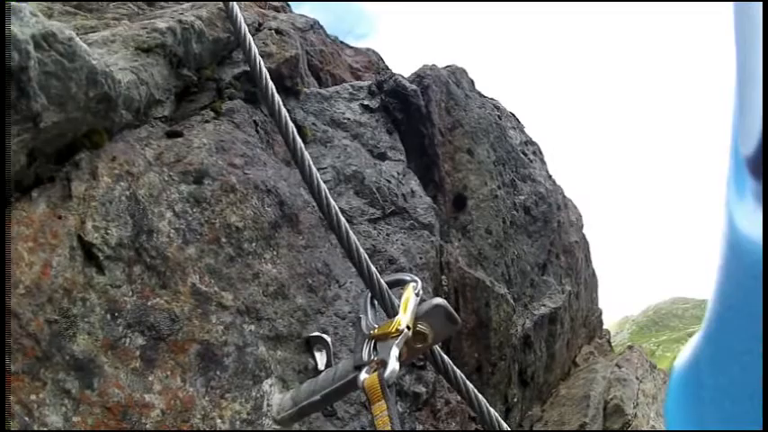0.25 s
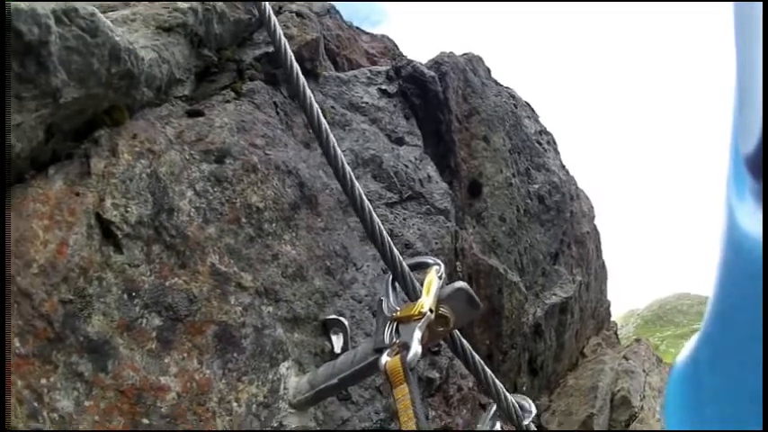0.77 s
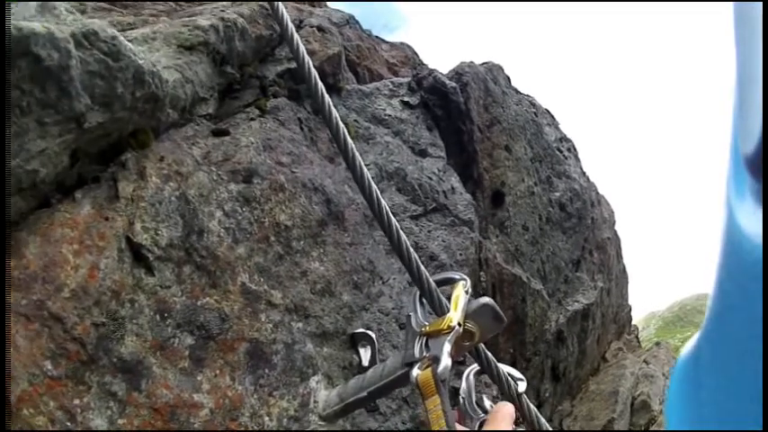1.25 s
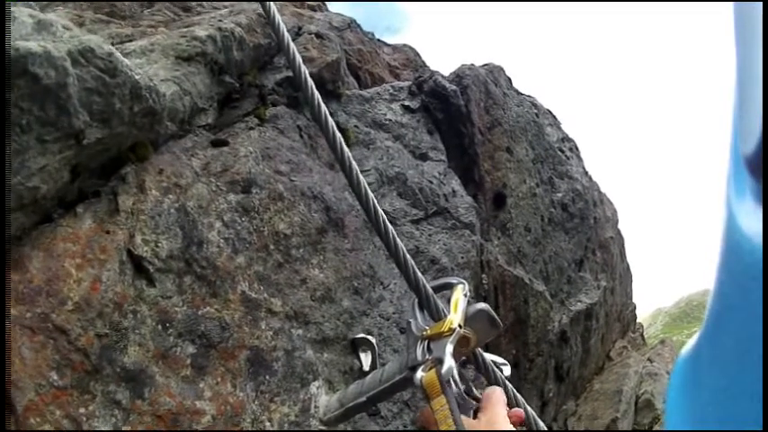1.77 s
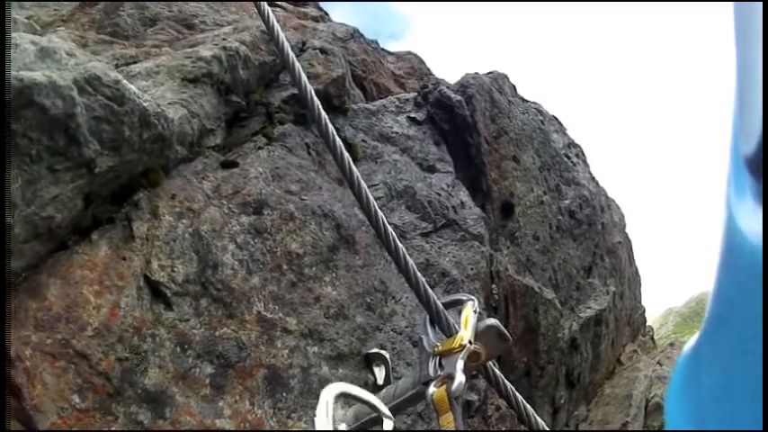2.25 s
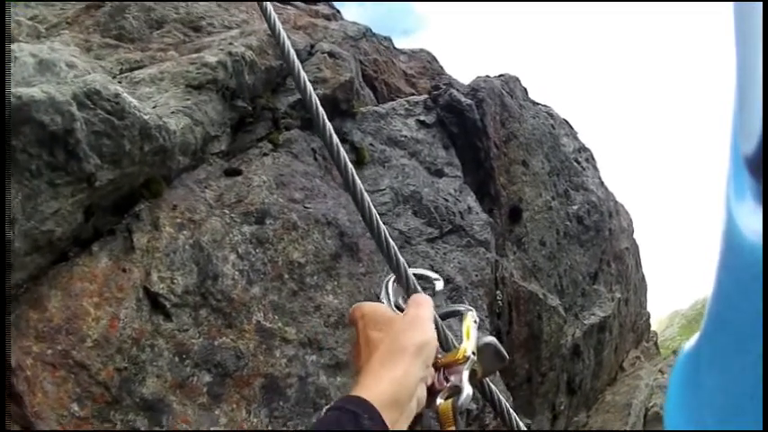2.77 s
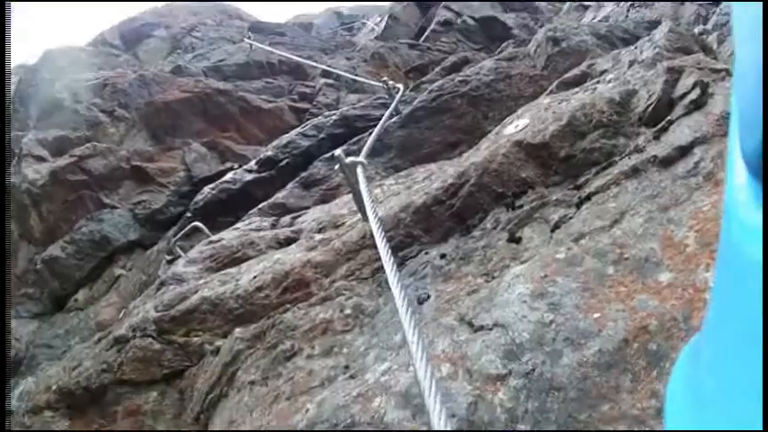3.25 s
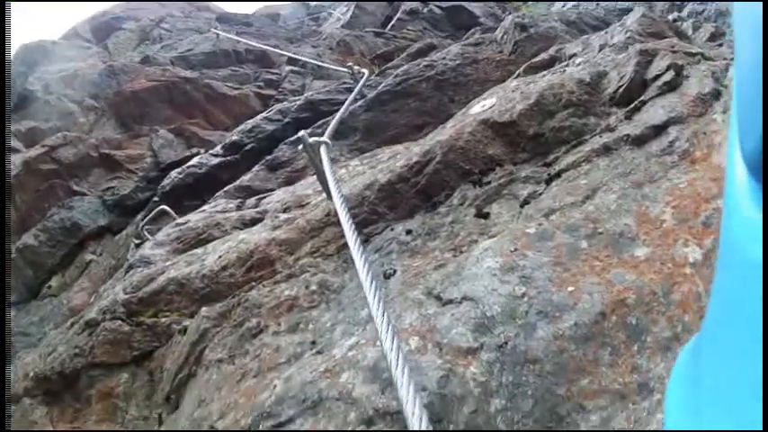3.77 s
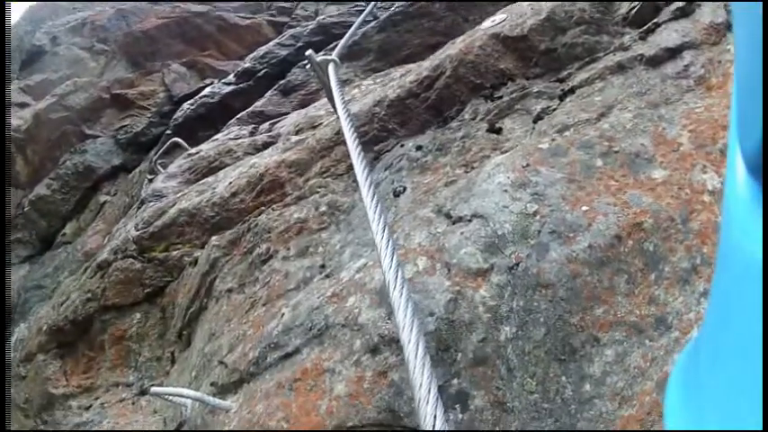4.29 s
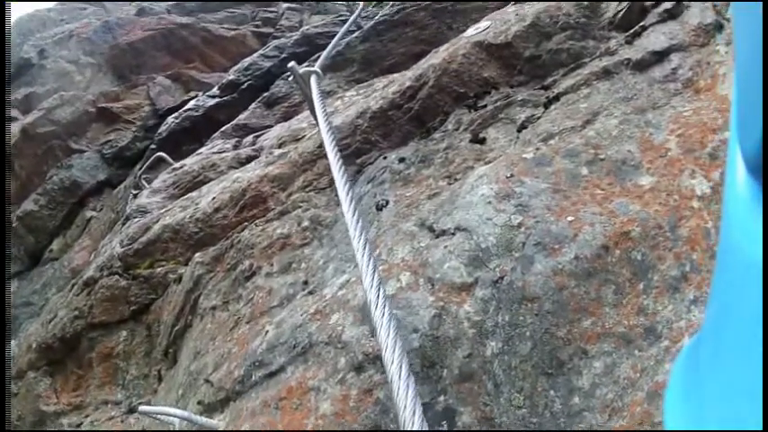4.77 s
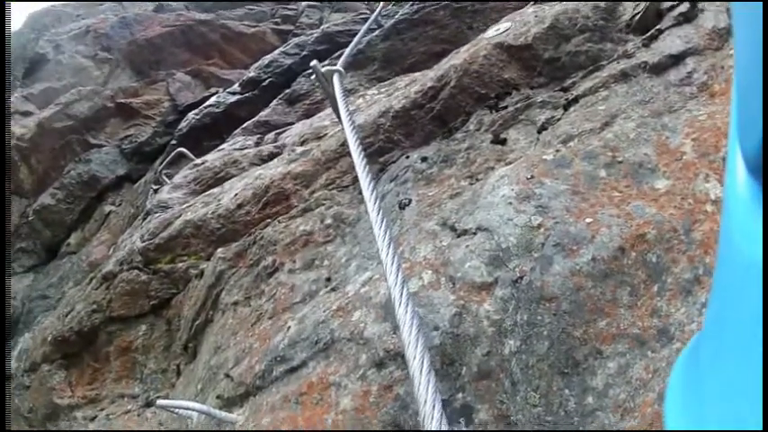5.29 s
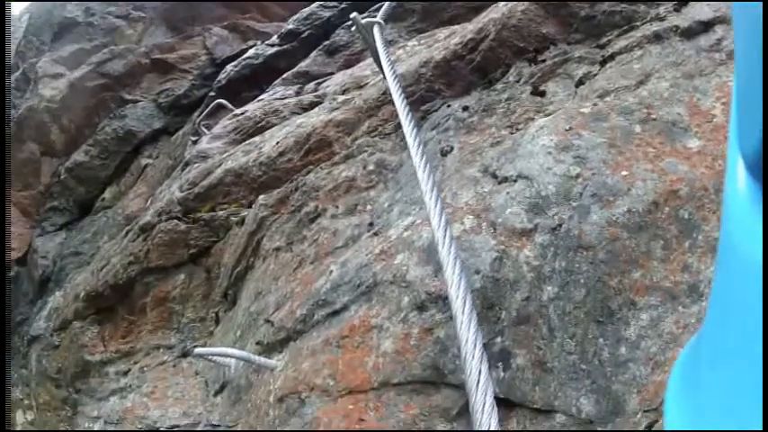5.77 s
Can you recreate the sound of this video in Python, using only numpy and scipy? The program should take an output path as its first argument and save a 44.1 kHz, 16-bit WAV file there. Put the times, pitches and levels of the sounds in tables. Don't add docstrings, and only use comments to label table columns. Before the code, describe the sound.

A climber handles metal carabiners on a steel cable at a rock face, heard close through a housed helmet microphone. Sparse light ticks lead to a hard clack, then a dense rattling cluster of clipping and scraping. Scattered knocks follow, then another busy burst of bright clinks with brief rings, fading into faint hiss.

```python
import sys
import numpy as np
from scipy import signal
from scipy.fft import rfft, irfft, next_fast_len
from scipy.io import wavfile
from scipy.ndimage import uniform_filter1d

SR = 44100
rng = np.random.default_rng(int(sys.argv[2]) if len(sys.argv) > 2 else 0)


def to_wav(sig):
    pcm = np.clip(np.atleast_2d(sig), -1, 1) * 32767
    pcm = np.round(pcm).astype(np.int16)
    wavfile.write(sys.argv[1], SR, pcm.T)


def amplitude_ratio(level_db):
    exponent = np.asarray(level_db, float) / 20
    return 10 ** exponent


N = 266364
TOUCH_SAMPLES = 4096

# pitch_hz, level_db
HOUSING_COLOUR = [(470, -76.5), (800, -40), (1880, -27), (2940, -19), (3380, -7.5), (4110, -4.5),
                  (5540, -5.5), (6290, -1.5), (6970, -7.5), (7560, -14.5), (8990, -25.5), (12600, -41),
                  (16300, -73), (22000, -120)]
# start_s, stopped_at_s, first_mode_db, second_mode_db, third_mode_db
FRAME_SWINGS = [(.439, 0.447, -68.5, -60, -54.5), (4.378, 4.438, -90, -53.5, -76),
                (4.442, 4.497, -99, -51.5, -54), (5.079, 5.147, -49, -31, -32.5),
                (5.279, 5.286, -66.5, -36.5, -32.5), (5.298, 5.312, -49.5, -30.5, -34),
                (5.318, 5.38, -90, -67.5, -63), (5.391, 5.406, -47.5, -28, -33.5),
                (5.444, 5.466, -43.5, -39.5, -33.5), (5.472, 5.496, -56.5, -80, -70),
                (5.515, 5.536, -57, -61.5, -44), (5.689, 5.697, -55, -17.5, -58.5)]


def along(points, hz):
    point_hz, value = np.transpose(points)
    return np.interp(np.log(hz + 1), np.log(point_hz + 1), value)


def causal(gain):
    cepstrum = irfft(np.log(gain + 1e-6))
    half = cepstrum.shape[-1] // 2
    cepstrum[..., 1:half] *= 2
    cepstrum[..., half + 1:] = 0
    return np.exp(rfft(cepstrum))


def hiss(spectrum):
    m = next_fast_len(N + 8192)
    gain = amplitude_ratio(along(spectrum, np.fft.rfftfreq(m, 1 / SR)))
    x = irfft(rfft(rng.standard_normal(m)) * gain, m)[:N]
    return x / x.std()


def flutter(length, size):
    x = uniform_filter1d(rng.standard_normal(length), size)
    x = uniform_filter1d(x, size)
    return x / x.std()


def placed(rows, seconds):
    at = np.round(seconds * SR).astype(int) + np.arange(rows.shape[1])
    return np.bincount(at.ravel(), rows.ravel(), N + SR)[:N]


def heading(t):
    # time_s, heading (0-1)
    head_turn = [(0, 0.14), (1.4, 0.12), (2.2, 0.22), (3, 0.55), (3.7, 0.72), (4.3, 0.73), (4.7, 0.94),
                 (6.04, 0.86)]
    return np.clip(np.interp(t, *np.transpose(head_turn)), 0, 1)


def background():
    # pitch_hz, level_db (per Hz)
    air_colour = [(12, -43), (20, -11.5), (40, -7), (110, -3), (190, -6), (560, -3.5), (800, -5.5),
                  (1350, -9.5), (1700, -9.5), (2500, -10.5), (3200, -17), (3900, -11.5), (5000, -26.5),
                  (7300, -46), (12600, -46.5), (16300, -75)]
    # pitch_hz, level_db (per Hz)
    valley_colour = [(1500, -44), (2400, -5.5), (3100, -14.5), (3900, -1.5), (4600, -12.5), (6300, -15.5),
                     (7500, -40.5)]
    # pitch_hz, level_db (per Hz)
    wall_colour = [(120, -18), (230, -1.5), (400, 3), (600, 0), (1000, -41.5)]
    t = np.arange(N) / SR
    turned = heading(t)
    facing_open_air = np.sin(np.pi * turned) ** 2
    rush = amplitude_ratio(-73 + 7 * facing_open_air) * hiss(valley_colour)
    wall_air = amplitude_ratio(-76 + 10 * turned) * hiss(wall_colour)
    whine_hz = SR / 4
    whine = amplitude_ratio(-88) * np.sin(2 * np.pi * whine_hz * t)
    whine += amplitude_ratio(-100) * np.sin(3 / 2 * np.pi * whine_hz * t)
    return amplitude_ratio(-58.5) * hiss(air_colour) + rush + wall_air + whine


def scrape():
    # start_s, length_s, level_db
    drags = [(0.333, .02, -57), (1.16, 0.097, -60), (1.484, 0.067, -61), (2.147, 0.069, -55),
             (2.574, 0.0647, -54), (2.649, .05, -42.5), (2.701, 0.067, -57.5), (2.823, 0.053, -50),
             (2.92, 0.0506, -52.5), (3.001, 0.098, -52), (3.097, 0.0437, -51), (3.149, 0.0617, -44),
             (3.43, 0.087, -65), (5.302, 0.0845, -62), (5.386, 0.041, -52.5), (5.445, 0.0303, -47.5),
             (5.499, .05, -49.5), (5.619, 0.084, -53.5), (5.689, 0.037, -48)]
    t = np.arange(N) / SR
    stroke = np.zeros(N)
    for s, length, db in drags:
        start = np.clip((t - s) / 0.0044, 0, 1)
        fade = np.clip((s + length - t) / (.4 * length), 0, 1)
        stroke += amplitude_ratio(db) * start * fade
    grain = amplitude_ratio(3.5 * flutter(N, size=40))
    grain /= np.sqrt(np.mean(grain ** 2))
    colour = [p for p in HOUSING_COLOUR if p[0] < 7800] + [(9000, -34), (13000, -60)]
    return stroke * grain * amplitude_ratio(-3) * hiss(colour)


def ring(s, stop, hz, db, t60):
    grip_t60 = .012
    t = np.arange(SR // 3) / SR
    held = np.clip(t - (stop - s), 0, None)
    waver_db = 1.64 * flutter(len(t), size=150)
    level = amplitude_ratio(db - 60 * t / t60 - 60 * held / grip_t60 + waver_db)
    level *= 1 - np.exp(-t / 0.00059)
    return level * np.sin(2 * np.pi * (hz * t + rng.random()))


def frames():
    # pitch_hz, t60_s
    first_modes = [(2729, 0.44), (4846, 0.162), (6462, 0.117), (9550, 0.075), (10410, 0.06)]
    # pitch_hz, t60_s
    second_modes = [(5385, 0.173), (7310, 0.218), (9520, 0.157)]
    # start_s, stopped_at_s, first_mode_db, second_mode_db, third_mode_db
    second_swings = [(1.713, 1.78, -66.5, -67, -94.5), (3.515, 3.56, -57, -80, -95),
                     (3.572, 3.604, -85, -71.5, -95), (3.904, 4.002, -49.5, -78, -94.5),
                     (4.004, 4.03, -69, -66, -78.5), (4.122, 4.146, -66.5, -66, -95),
                     (4.369, 4.42, -60, -78.5, -95), (5.613, 5.69, -69.5, -50, -69),
                     (5.716, 5.8, -62, -71.5, -94.5)]
    # start_s, stopped_at_s, pitch_hz,
    # level_db, t60_s
    lone_pings = [(.338, .349, 8230, -54.5, .2), (.343, .349, 8230, -51, 0.205),
                  (.422, .45, 2600, -45, .034), (.421, .47, 5020, -34, .05), (.424, .46, 4000, -44.5, .04),
                  (.683, .76, 6465, -65, .16), (1.237, 1.265, 5910, -54.5, 0.077),
                  (2.1485, 2.18, 4542, -16, 0.0188), (2.1485, 2.2, 2542, -23.5, 0.02),
                  (2.1485, 2.18, 6485, -22, 0.0213), (3.853, 3.862, 5096, -23.5, 0.0296),
                  (3.086, 3.098, 6400, -28, 0.058), (3.16, 3.21, 9700, -64.5, 0.132),
                  (4.148, 4.18, 5900, -51, 0.068), (5.299, 5.306, 7785, -40, 0.096),
                  (5.444, 5.463, 3020, -30, 0.041), (5.495, 5.501, 2947, -35, .27),
                  (5.495, 5.498, 5650, -44, .1), (5.499, 5.517, 8460, -50, 0.224),
                  (5.5035, 5.511, 7390, -26, 0.044), (5.65, 5.663, 8200, -62.5, 0.098),
                  (5.691, 5.7, 3945, -20, 0.048), (5.705, 6.035, 4753, -53, 0.578),
                  (5.617, 5.69, 6643, -53.5, .13), (5.617, 5.69, 4797, -56.5, 0.51),
                  (5.9, 5.93, 7300, -79, .3), (5.705, 5.72, 11700, -79.5, .1),
                  (5.08, 5.125, 9620, -65.5, 0.105), (5.299, 5.315, 9600, -59.5, 0.079),
                  (2.651, 2.666, 10300, -64.5, .06), (2.575, 2.587, 10300, -70, .06),
                  (2.958, 2.97, 8400, -74.5, .1), (4.296, 4.302, 11180, -69.5, .05),
                  (5.691, 5.699, 7500, -29, .04), (5.716, 5.8, 6605, -64.5, 0.22)]
    pings = list(lone_pings)
    for s, stop, *dbs in FRAME_SWINGS:
        dbs += [dbs[-1] - 36.5] * 2
        pings += [(s, stop, hz, db, t60) for (hz, t60), db in zip(first_modes, dbs)]
    for s, stop, *dbs in second_swings:
        pings += [(s, stop, hz, db, t60) for (hz, t60), db in zip(second_modes, dbs)]
    return placed(np.array([ring(*row) for row in pings]), np.array(pings)[:, :1])


def chatter():
    # start_s, length_s, level_db, pitch_hz
    slides = [(0.691, 0.0138, -53.5, 3400), (0.75, 0.0108, -46, 3500), (0.779, 0.0084, -48.5, 3650),
              (0.921, 0.0318, -50, 6040), (1.107, 0.0605, -53, 3900), (3.864, 0.0292, -47, 3500),
              (2.164, .034, -44, 4390), (2.845, 0.0214, -45.5, 3900), (2.946, 0.0212, -51.5, 4150),
              (3.433, 0.037, -47.5, 3400), (5.517, 0.059, -50, 3600), (5.702, 0.02, -45, 4250)]
    count = 4
    taps = []
    for s, length, db, hz in slides:
        for k, (late, size, tone) in enumerate(rng.standard_normal((count, 3))):
            tap_s = s + length * (k + .5 + late / 4) / count
            taps.append((tap_s, db + 3 * size, hz * (1 + .08 * tone)))
    return taps


def touches():
    # start_s, peak_db, pitch_hz (strongest
    light_taps = [(.275, -49.5, 6500), (.3022, -37, 6020), (.3377, -47, 6080), (.3487, -32.5, 4400),
                  (.659, -40, 4890), (.6796, -36, 5350), (.728, -34, 5850), (.745, -32.5, 5465),
                  (1.055, -32.5, 3953), (1.1622, -36.5, 3780), (1.1722, -34, 3970), (1.192, -35, 3970),
                  (1.207, -26, 4890), (1.2187, -31, 4035), (1.24, -32, 3940), (1.3047, -35.5, 4086),
                  (1.4844, -34.5, 4010), (1.5036, -34, 4080), (1.5193, -35, 4110), (1.5372, -36, 4470),
                  (1.5532, -40.5, 4490), (1.652, -41.5, 4550), (1.716, -41, 4980), (1.8536, -42.5, 4480),
                  (1.9064, -37.5, 4660), (2.1784, -34.5, 4570), (2.208, -36, 2500), (2.4278, -35.5, 3915),
                  (2.619, -37.5, 4250), (2.8866, -33, 3770), (2.929, -34, 6370), (3.01, -36.5, 4000),
                   (3.059, -35, 4200), (3.1024, -30, 6100), (3.124, -36.5, 5940), (3.1943, -38, 5950),
                   (3.279, -43.5, 3870), (3.4162, -35.5, 3620), (3.4456, -32.5, 3660),
                   (3.4795, -34.5, 3310), (3.498, -30.5, 3850), (3.6226, -51, 2440), (3.904, -30, 3458),
                   (4.122, -32.5, 4010), (4.1452, -34.5, 3930), (4.1578, -40, 3930), (4.2602, -42, 3850),
                   (4.296, -45, 3900), (4.3692, -40, 5000), (5.148, -36.5, 4992), (5.3457, -37, 3850),
                   (5.4143, -37, 3220), (5.496, -36, 2940), (5.5496, -33, 4930), (5.5532, -32.5, 5150),
                   (5.649, -27.5, 3920), (5.675, -34, 4480), (5.7143, -36, 4840),
                  (.334, -44.5, 5000), (1.1414, -45, 3910), (1.1676, -42.5, 4500),
                      (1.1965, -40.5, 6000), (1.5753, -47, 4000), (2.706, -42.5, 4500),
                      (2.714, -38.5, 4220), (2.7217, -37, 5200), (2.751, -38, 5980), (2.7547, -38.5, 4070),
                      (2.8509, -39, 5880), (2.959, -40.5, 4100), (2.9868, -45, 3880), (3.0178, -37.5, 5300),
                      (3.027, -37, 4000), (3.0384, -36, 3820), (3.046, -41, 6000), (3.1306, -35.5, 4400),
                      (3.137, -33.5, 3590), (3.171, -33, 4100), (3.1742, -35.5, 4300), (3.389, -48.5, 6020),
                      (3.4413, -46, 5500), (3.463, -46.5, 3700), (3.5605, -43.5, 4000), (4.284, -49, 3900),
                      (4.372, -39, 4240), (4.3767, -39.5, 5190), (5.36, -39.5, 4900), (5.5784, -46, 3840),
                      (5.709, -34.5, 3800), (5.7186, -38.5, 4700)]
    # start_s, peak_db, pitch_hz, low_share_db, t60_s
    hard_blows = [(2.1455, -37.5, 6020, -7.5, .01), (2.1485, -16.5, 4320, -11.5, 0.0123),
                  (2.1536, -32, 4410, 3, .018), (2.5678, -23, 3965, -6, 0.0124),
                  (2.5703, -19.5, 4910, -7, 0.0253), (2.5798, -30.5, 4900, -10, 0.0096),
                  (2.5826, -34, 5100, -8.5, .015), (2.6498, -22, 4000, -18, 0.0137),
                  (2.66, -26.5, 6380, -18.5, 0.0122), (2.6624, -16, 6297, -20.5, 0.0137),
                  (2.6668, -28, 6400, -20.5, 0.016), (2.6724, -22, 6180, -19, 0.0102),
                  (2.6755, -23, 4310, -19, 0.0093), (2.679, -25, 6400, -19, .018),
                  (2.6825, -22.5, 4890, -26.5, 0.0078), (2.6849, -21, 4400, -23.5, 0.019),
                  (2.736, -24, 4606, -6.5, 0.0258), (2.8243, -24.5, 3780, -4, 0.0092),
                  (2.8263, -22.5, 6015, -11, 0.0145), (2.832, -34.5, 6200, -9, .012),
                  (2.8385, -14.5, 6200, -8, 0.0074), (2.8415, -24.5, 3730, 1.5, 0.021),
                  (2.9368, -15.5, 3890, -4.5, 0.0103), (2.939, -16.5, 6395, -4, .011),
                  (2.9425, -27, 6260, -8.5, 0.018), (3.033, -28.5, 4230, -14.5, .014),
                  (3.0676, -31, 4060, 0, .02), (3.0768, -27.5, 5900, -18.5, 0.0224),
                  (3.0822, -12.5, 6227, -14.5, 0.00505), (3.0834, -10.5, 4383, -14, 0.0108),
                  (3.1445, -30, 6200, -15, .015), (3.1484, -8.5, 4400, -6, 0.0096),
                  (3.1505, -16, 6250, -15, 0.0142), (3.1544, -6, 6398, -15, 0.0073),
                  (3.156, -8.5, 4252, -17.5, .022), (3.1656, -20, 4300, -16, 0.0102),
                  (3.1778, -22, 6100, -19.5, 0.0128), (3.1821, -18.5, 4100, -13.5, .008),
                  (3.1845, -22, 6280, -14, 0.019),
                  (.4192, -33, 4900, -18, 0.0142), (.4213, -22, 6600, -13.5, 0.016),
                      (.424, -25, 6500, -18, .018), (.6643, -24.5, 3674, 3, 0.0135),
                      (.668, -30, 5800, 0, 0.0128), (3.334, -37.5, 3500, -1.5, 0.0216),
                      (3.3383, -32.5, 3600, -0.5, 0.022), (3.51, -21, 4163, -1.5, 0.0059),
                      (3.516, -35, 3770, 4, 0.031), (3.57, -25, 4480, -2.5, 0.0109),
                      (3.8526, -10, 3728, -15, 0.0122), (4.0066, -21, 3700, -4.5, 0.0193),
                      (4.0317, -20, 4150, -15, .017), (4.442, -27, 3830, -13, .016),
                      (5.0761, -17.5, 3850, -1.5, .047), (5.2781, -21, 3800, 1, 0.0067),
                      (5.281, -32, 6500, 0, .02), (5.294, -32, 3800, -7, 0.014),
                      (5.2968, -10.5, 4827, -12.5, 0.0069), (5.3, -25, 3684, -9, 0.0117),
                      (5.3113, -29, 4800, -10.5, 0.0062), (5.388, -33, 4800, -7.5, 0.0114),
                      (5.3904, -9, 4837, -10.5, 0.0087), (5.4435, -17.5, 3850, -1, 0.0083),
                      (5.4448, -18, 4810, -1.5, 0.0143), (5.4757, -25, 2464, 5.5, 0.0115),
                      (5.503, -14, 3910, -6.5, 0.009), (5.5072, -25, 3920, -2.5, .015),
                      (5.5142, -17, 3780, -2, 0.013), (5.6148, -16.5, 3900, -6, 0.0094),
                      (5.6385, -32, 3900, -3.5, .012), (5.6405, -29.5, 3700, -4, .008),
                      (5.69, -17, 4610, -11, .015), (5.6922, -7.5, 4780, -16, 0.0131)]
    low_share_db, tap_t60 = -5, 0.0264
    taps = light_taps + chatter()
    return hard_blows + [tuple(row) + (low_share_db, tap_t60) for row in taps]


def blows(s, t60, roughness):
    rise_s = .0002
    t = np.arange(TOUCH_SAMPLES) / SR
    start, stop = np.transpose(FRAME_SWINGS)[:2]
    free = ((s > start - .003) & (s < stop - .004)).any(axis=1, keepdims=True)
    t60 = np.clip(.8 * t60, .003, np.where(free, .012, .08))
    blow = rng.standard_normal(roughness.shape) * amplitude_ratio(2 * roughness) * amplitude_ratio(-60 * t / t60)
    blow *= (1 - np.exp(-t / (rise_s + 0.013 * t60))) ** 2
    blow[:, round(3 * rise_s * SR)] += amplitude_ratio(-21) * np.sqrt(t60[:, 0] * SR)
    return blow


def rock_scatter(roughness):
    t = np.arange(TOUCH_SAMPLES) / SR
    scatter = rng.standard_normal(roughness.shape) * amplitude_ratio(-20 - 60 * t / 0.0768)
    scatter *= 1 - np.exp(-t / 0.0018)
    lumps = uniform_filter1d(roughness, size=50, axis=1)
    scatter *= amplitude_ratio(3 * lumps / lumps.std())
    return scatter * np.clip((TOUCH_SAMPLES - np.arange(TOUCH_SAMPLES)) / 600, 0, 1)


def touch_colour(s, db, low_db, hz):
    gear_modes = [2600, 3500, 3850, 4150, 4864, 5423, 5907, 6342, 6500, 7352, 8263, 9570, 10630]
    low = 1 / (1 + (hz / 3100) ** 12)
    high = 1 - 1 / (1 + (hz / 5300) ** 12)
    high_db = -4.5 + rng.standard_normal(s.shape)
    colour = amplitude_ratio(along(HOUSING_COLOUR, hz) + low * (low_db + 18.0) + high * (high_db + 1.0))
    treble_db = -2 + 5 * heading(s) ** 8.3 + 0.332 * (db + 21)
    treble_db += 6 * ((s > 3.3) & (s < 4.1))
    colour *= amplitude_ratio(-treble_db / (1 + (hz / 7600) ** 12))
    choked = np.ones_like(colour)
    for mode_hz in gear_modes:
        strength = amplitude_ratio(-5.0 + 2.58 * rng.standard_normal(s.shape))
        choked += strength / (1 + ((hz - mode_hz) / 90) ** 2)
    return colour * choked


def contacts():
    s, db, peak_hz, low_db, t60 = np.transpose(touches())[:, :, None]
    hz = np.fft.rfftfreq(TOUCH_SAMPLES, 1 / SR)
    roughness = rng.standard_normal((len(s), TOUCH_SAMPLES))
    struck = 1 + amplitude_ratio(10) / (1 + ((hz - peak_hz) / 170) ** 2)
    sound = rfft(blows(s, t60, roughness), axis=1) * causal(struck)
    sound += rfft(rock_scatter(roughness), axis=1) / (1 + 1j * hz / 9500) ** 3
    rows = irfft(sound * causal(touch_colour(s, db, low_db, hz)), TOUCH_SAMPLES)
    power = np.abs(uniform_filter1d(rows ** 2, size=40, axis=1))
    top = np.sqrt(power.max(axis=1, keepdims=True))
    return placed(rows / top * amplitude_ratio(db - 8), s - .0005)


def scene():
    return np.tile(background() + scrape() + frames() + contacts(), (2, 1))


def top_cut(x):
    return signal.sosfilt(signal.butter(12, 12700, fs=SR, output="sos"), x)


def record(dry):
    own_colour = [(3000, -42.0), (6000, -2.5), (12500, -9), (13000, -62.0)]
    own = amplitude_ratio(-87.0) * np.array([hiss(own_colour) for _ in dry])
    treble = signal.sosfilt(signal.butter(4, 2200, "high", fs=SR, output="sos"), dry[0])
    treble_flicker = amplitude_ratio(-37.5) * treble * hiss([(10, 11.5), (150, -3.5), (400, -43.0)])
    wide = dry + own + np.array([treble_flicker, -treble_flicker])
    below_top = np.fft.rfftfreq(N, 1 / SR) < 12750
    limited = irfft(rfft(wide, axis=1) * below_top, N)
    return top_cut(limited)


dry = scene()
out = record(dry)
to_wav(out)
```